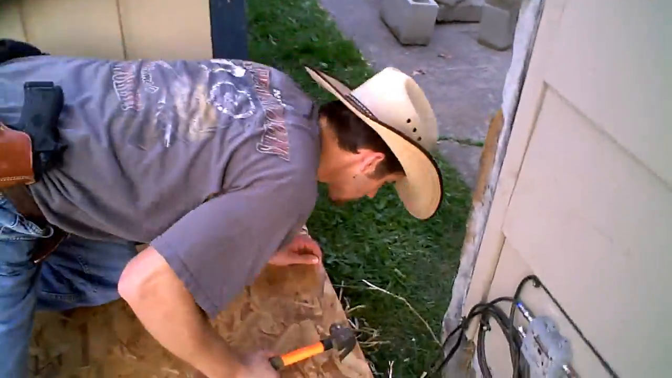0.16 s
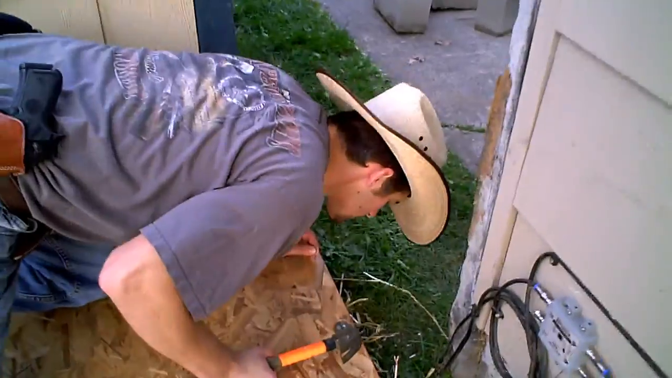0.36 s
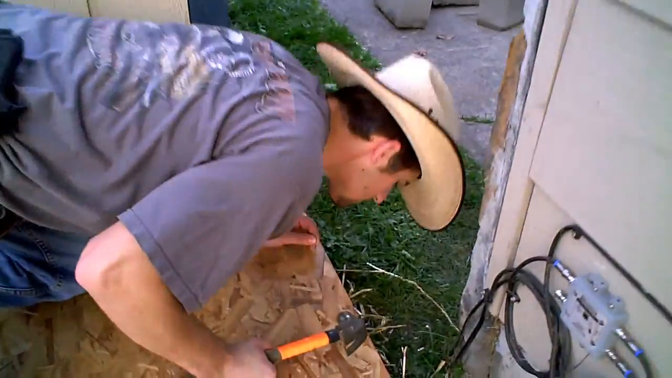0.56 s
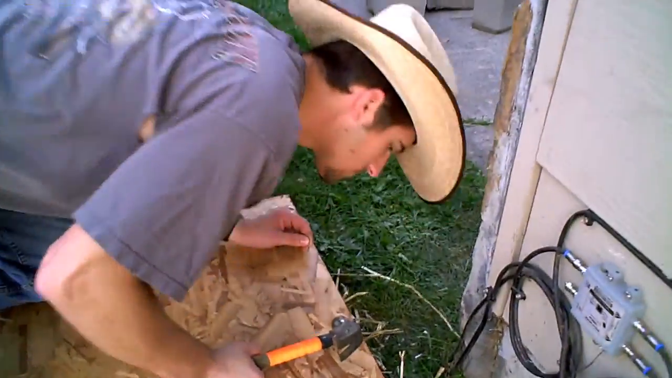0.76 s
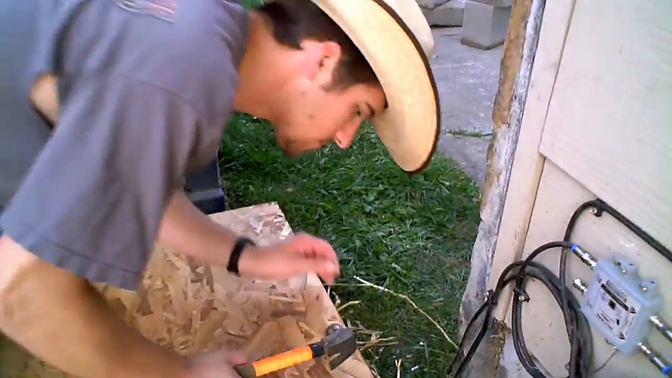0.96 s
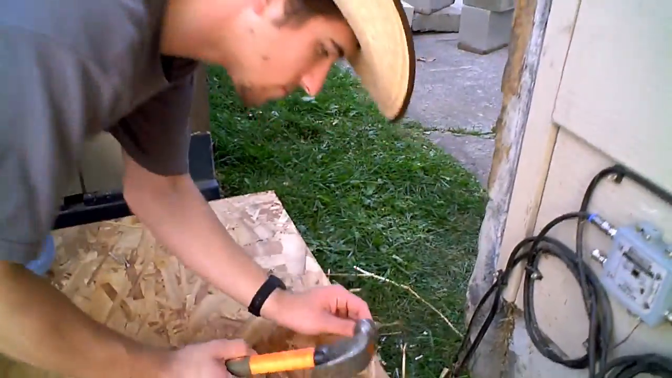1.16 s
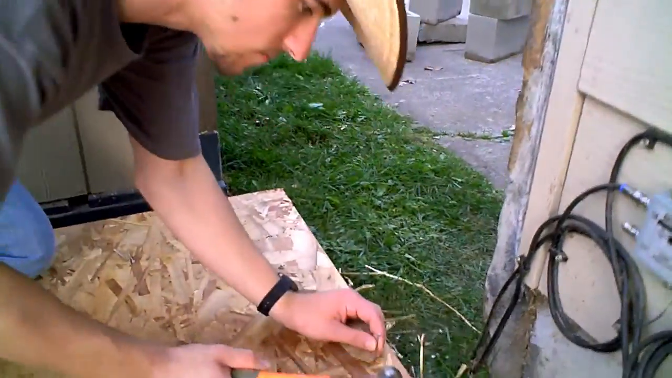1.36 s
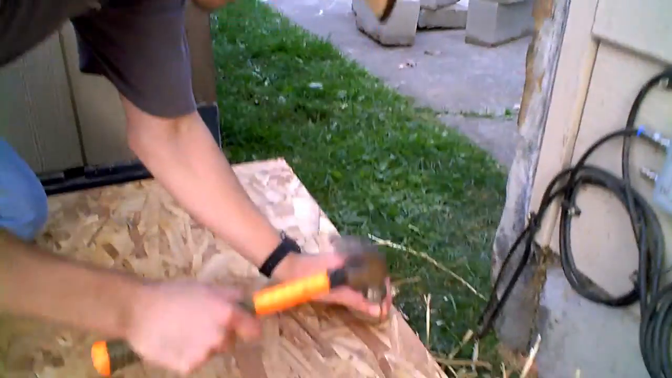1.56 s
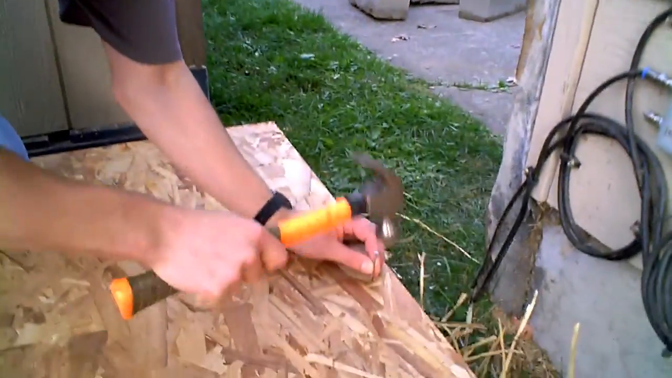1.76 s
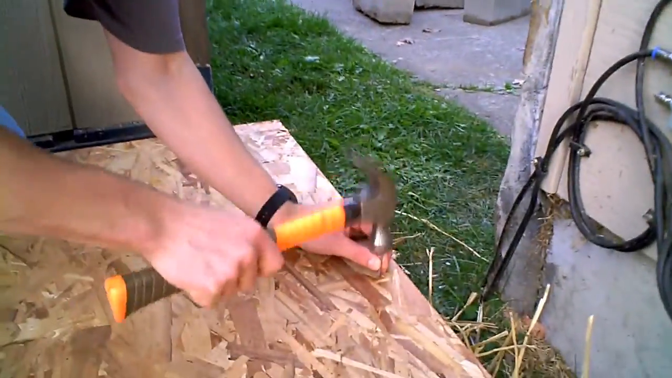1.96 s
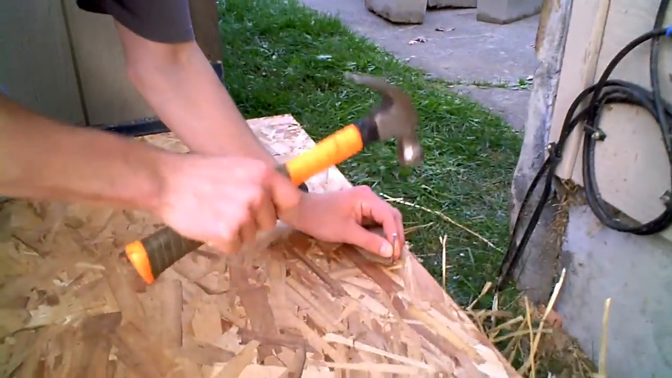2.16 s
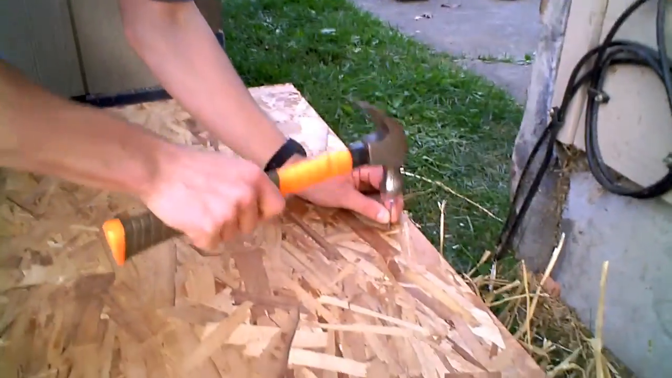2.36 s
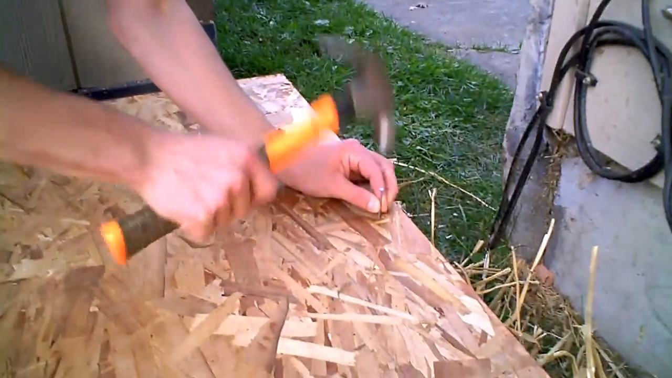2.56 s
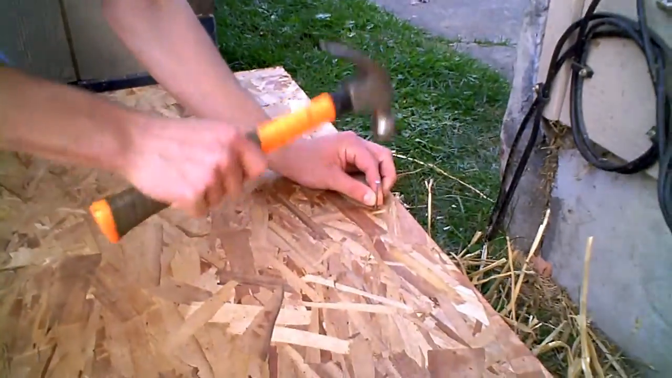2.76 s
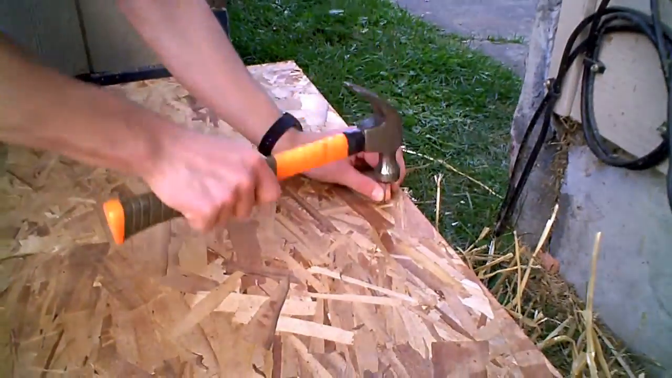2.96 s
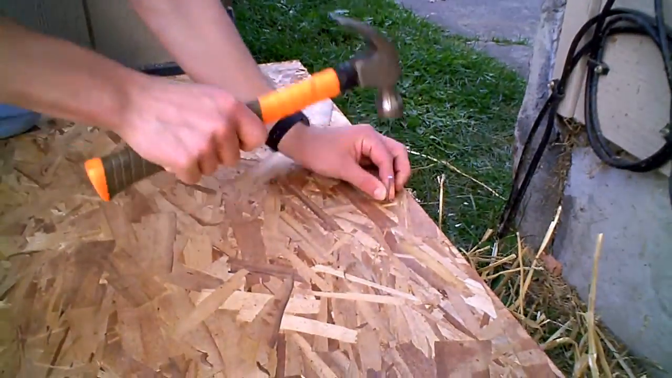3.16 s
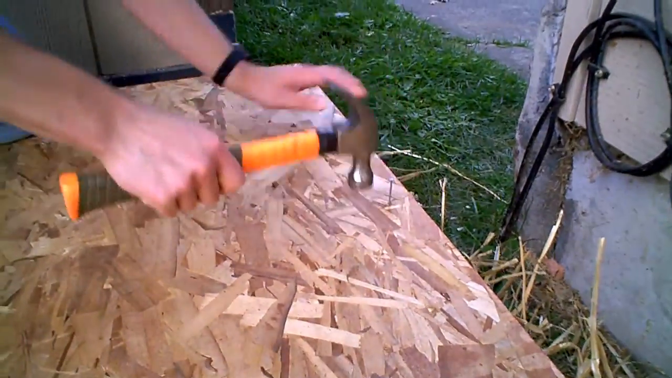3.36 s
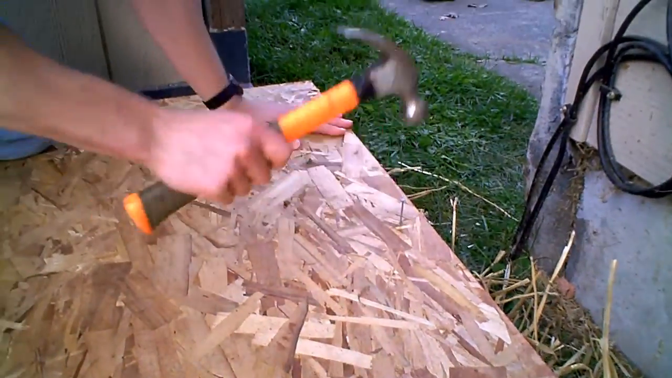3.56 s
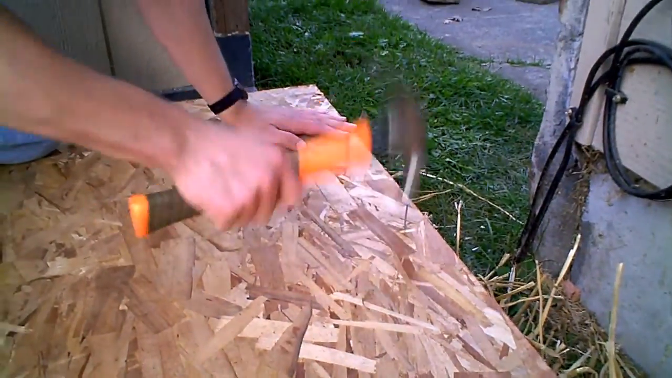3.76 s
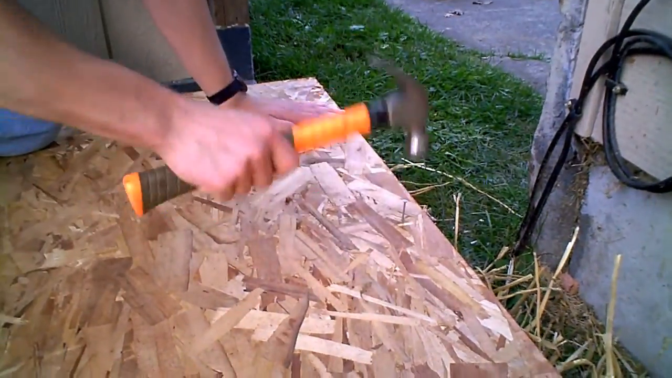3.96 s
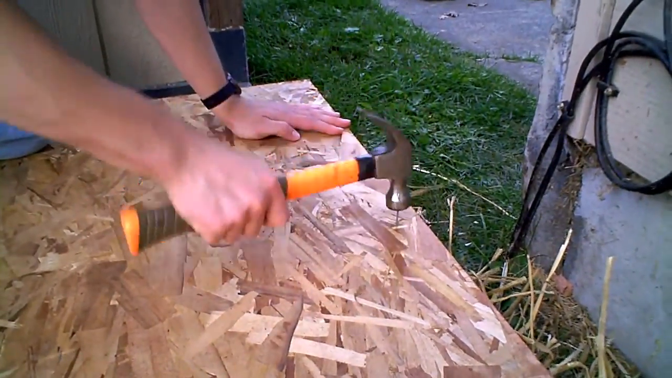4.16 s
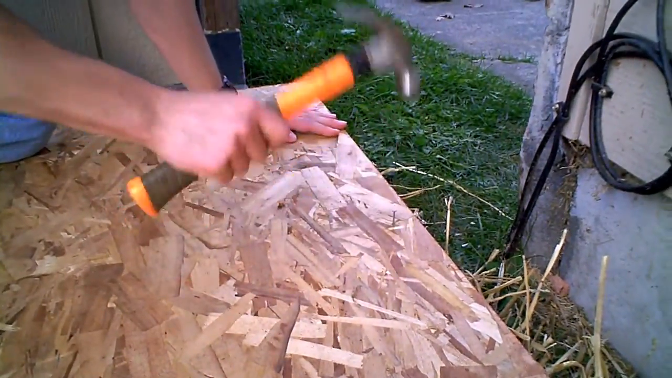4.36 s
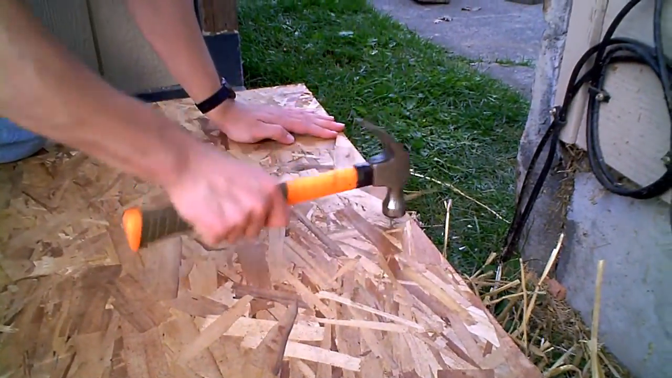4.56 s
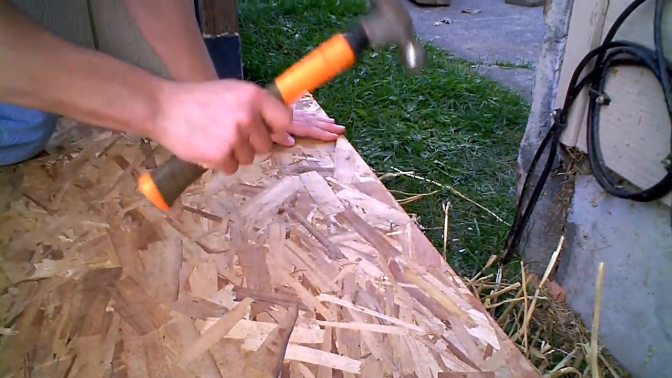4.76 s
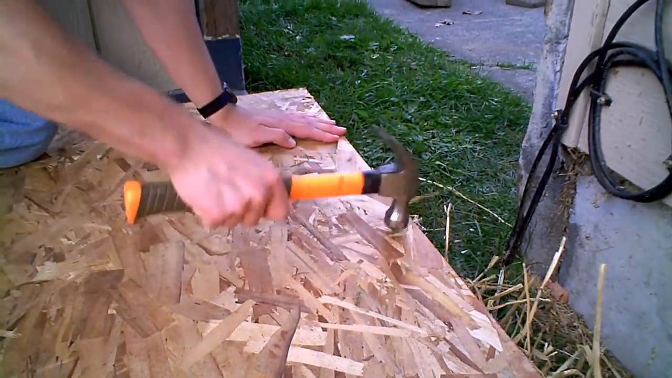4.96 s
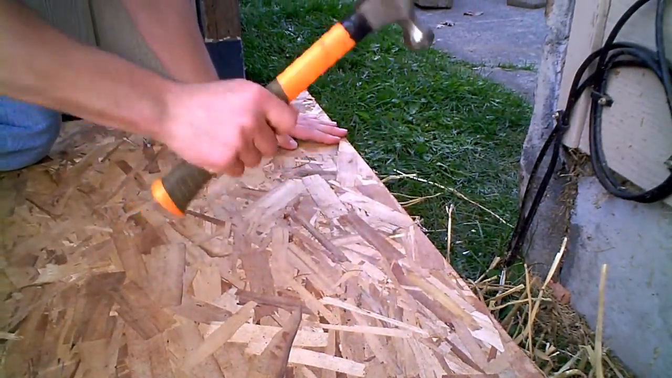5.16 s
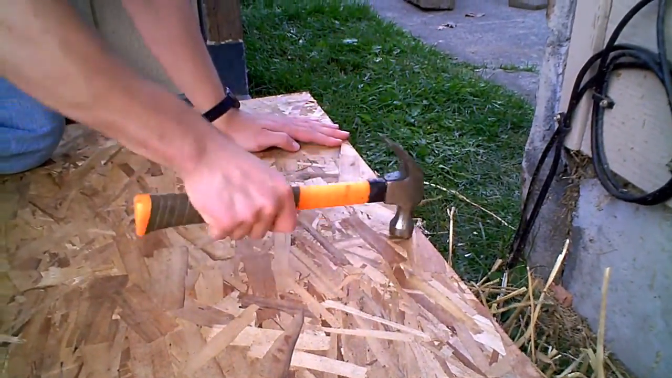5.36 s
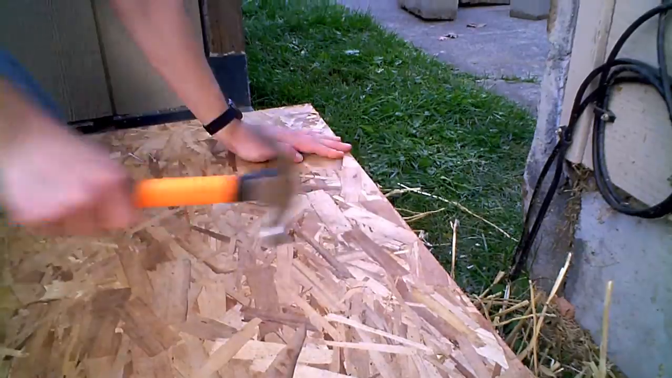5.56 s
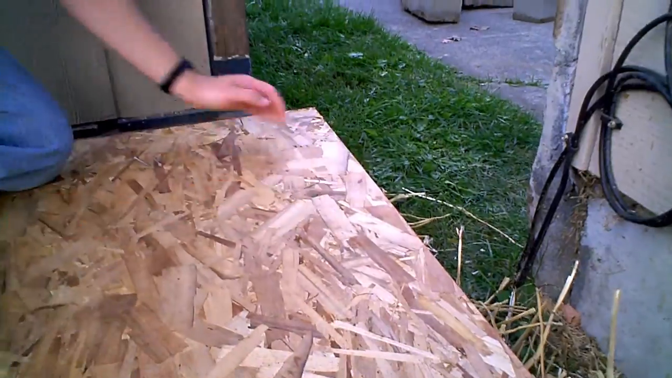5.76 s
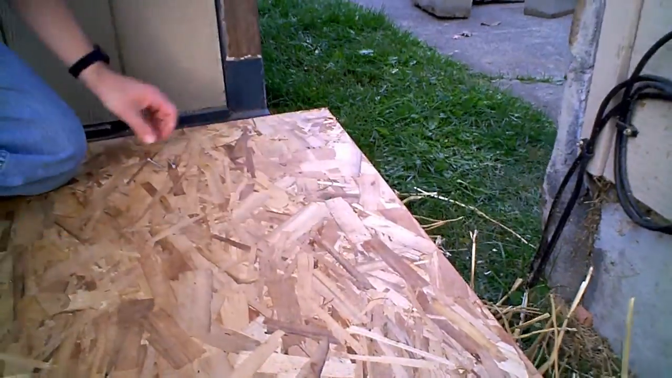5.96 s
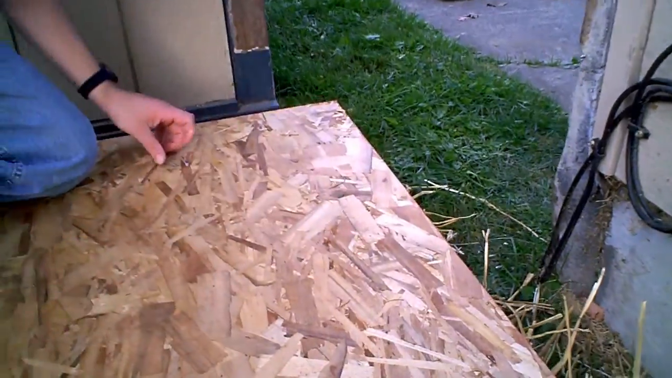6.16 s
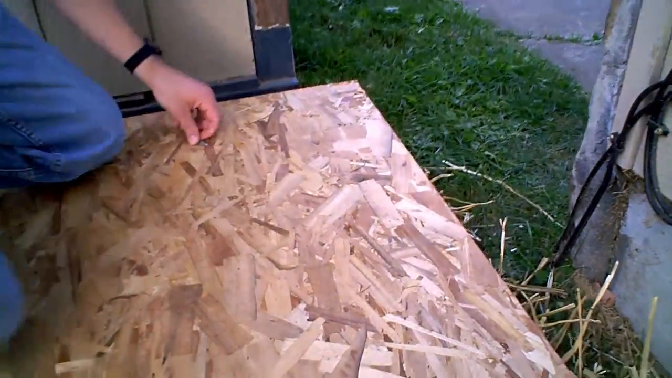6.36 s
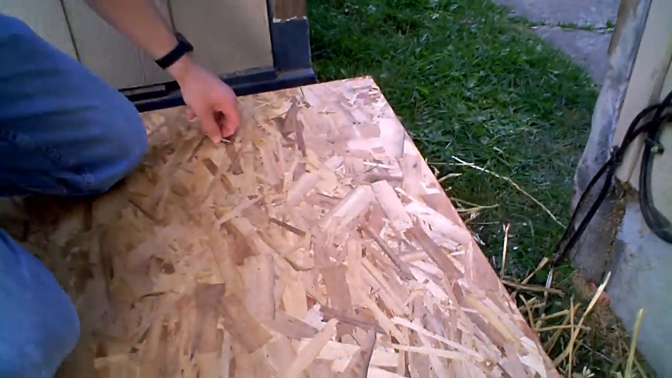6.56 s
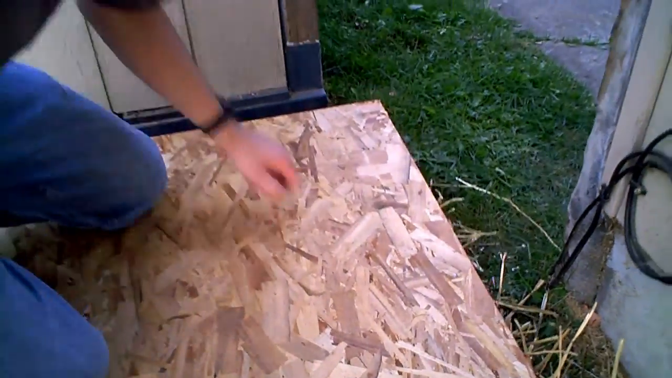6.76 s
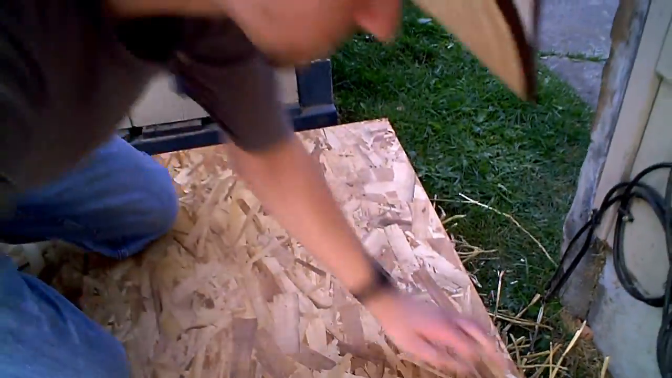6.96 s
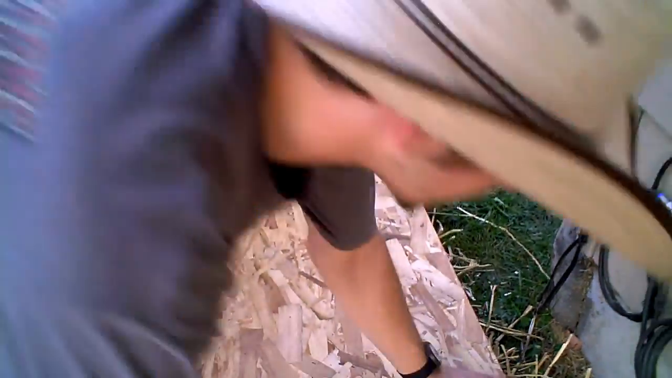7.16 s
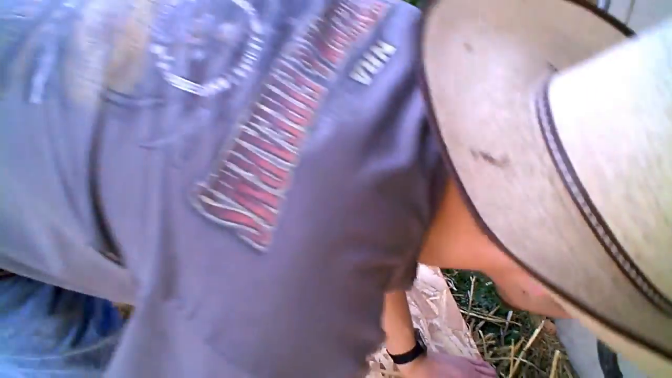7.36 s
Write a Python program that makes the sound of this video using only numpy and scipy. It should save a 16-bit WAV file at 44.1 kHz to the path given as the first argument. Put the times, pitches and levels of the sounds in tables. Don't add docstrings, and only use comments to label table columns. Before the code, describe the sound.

Nine sharp hammer blows on a nail in hollow chipboard, overloaded and boomy, small nail rattles between, then hand taps and quiet yard hum.

```python
import sys
import numpy as np
from scipy import signal
from scipy.io import wavfile

SR = 44100
rng = np.random.default_rng(int(sys.argv[2]) if len(sys.argv) > 2 else 0)


def gain_from_db(level_db):
    decades = np.asarray(level_db, float) / 20
    return 10 ** decades


def wav_record(signal):
    frames = np.transpose(np.atleast_2d(signal))
    bounded = np.clip(frames, -1, 1)
    quanta = np.round(bounded * 32767).astype(np.int16)
    wavfile.write(sys.argv[1], SR, quanta)


N = 326781
RAIL = .38

# start in seconds, peak in dB, nail ring in Hz, brightness in dB per octave,
# echo tail in dB.
BLOWS = [
    (1.948, -20.5, 4560, -0.5, -27),
    (2.259, -9.5, 3150, -1.5, -22),
    (2.568, -6, 3025, -0.5, -19.5),
    (2.891, -1, 4503, -2, -26.5),
    (3.751, -6, 3600, 2.5, -13),
    (4.128, -9.5, 4560, 2, -12.5),
    (4.497, -10.5, 3310, 3.5, -11.5),
    (4.86, -9, 2584, 1, -17.5),
    (5.221, -4, 3576, 2, -16),
]


def rms_one(x):
    return x / np.sqrt(np.mean(x ** 2) + 1e-20)


def at_hz(points, hz):
    table_hz, values = np.transpose(points)
    return np.interp(np.log(hz), np.log(table_hz), values)


def drift(rate_hz):
    knots = rng.standard_normal(400)
    return np.interp(np.arange(N) / SR * rate_hz, np.arange(400), knots)


def ring(clicks, hz, t60_s):
    r, w = gain_from_db(-60 / (t60_s * SR)), 2 * np.pi * hz / SR
    return signal.lfilter([0, np.sin(w)], [1, -2 * r * np.cos(w), r * r], clicks + 1e-18)


def bands(size, low_hz=30, step_octaves=.5):
    white = rng.standard_normal((2, size))
    edges_hz = low_hz * 2 ** np.arange(0, np.log2(19000 / low_hz), step_octaves)
    for k, (a, b) in enumerate(zip(edges_hz, edges_hz[1:])):
        band = signal.butter(2, [a, b], "band", fs=SR, output="sos")
        yield np.sqrt(a * b), signal.sosfilt(band, white[k % 2])


def highpass(x, order, hz):
    return signal.sosfilt(signal.butter(order, hz, "high", fs=SR, output="sos"), x)


def add(out, x, start_s):
    i = round(start_s * SR)
    x, i = x[max(-i, 0):], max(i, 0)
    out[i:i + len(x)] += x[:N - i]


def stroke(start_s, length_s, rise, fall_db):
    t = (np.arange(N) / SR - start_s) / length_s
    press = np.clip(t / rise, 0, 1)
    release = np.clip((1 - t) * length_s / 0.028, 0, 1)
    return press * release * gain_from_db(-fall_db * np.clip(t - rise, 0, 1))


def traffic():
    # Hz, dB per Hz.
    colour = [(18, -82), (30, -60.5), (70, -33.5), (86, -13), (121, -26), (184, -11.5), (266, -9.5),
              (336, -7), (526, -4), (760, -3), (962, -2), (1070, -4), (2480, -21), (5900, -29),
              (16000, -42.5)]
    # time in seconds, level in dB.
    swell_db = [(0.0, -55.5), (0.6, -57.5), (1.53, -56), (2.0, -58), (2.81, -56.5), (3.82, -58),
                (5.94, -57), (6.97, -54.5), (7.41, -56)]
    # start in seconds, length in seconds, pitch in Hz,
    # glide in Hz per second, level in dB.
    whines = [
        (5.85, .27, 457, -8.5, -65),
        (6.22, .2, 455, -8, -64),
        (6.432, .1, 449, -0.5, -60),
        (6.57, 0.44, 453, -20, -62.5),
        (6.71, .18, 474, 150, -60),
        (5.4, .75, 336, 5, -70),
        (4.969, 0.16, 895, 150, -59),
        (7.06, .1, 582, 20.5, -49.5),
        (7.181, 0.059, 592, 60.5, -48.5),
    ]
    calm_db, stirred_db, stirred_t60_s = -80, -70, 1.6
    t, hum, rumble = np.arange(N) / SR, 0, 0
    for hz, noise in bands(N, step_octaves=1 / 3):
        noise = gain_from_db(at_hz(colour, hz) + 1.1 * drift(8.0)) * noise
        if hz > 200:
            hum = hum + noise
        else:
            rumble = rumble + noise
    rumble_level = gain_from_db(calm_db)
    for s, db, *_ in BLOWS:
        decay_db = 60 * np.abs(t - s) / stirred_t60_s
        rumble_level = rumble_level + (t > s) * gain_from_db(min(db + 10, 0) + stirred_db - decay_db)
    hum_level = gain_from_db(np.interp(t, *np.transpose(swell_db)) - 0.13)
    out = hum_level * rms_one(hum) + rumble_level * rms_one(rumble)
    for s, length_s, hz, glide, db in whines:
        pitch_hz = hz + glide * (t - s) + 3.0 * drift(20.0)
        level = stroke(s, length_s, .2, 0) * gain_from_db(db + 3 + 1.5 * drift(15.0))
        out += level * np.sin(2 * np.pi * np.cumsum(pitch_hz) / SR)
    return out


def brushing():
    # start in seconds, length in seconds, level in dB.
    strokes = [(0.78, 0.11, -76.5), (0.967, 0.064, -76), (1.06, .11, -73), (3.125, 0.065, -76),
               (3.166, 0.046, -63.5), (3.378, 0.041, -51), (5.4, .08, -79), (5.57, .07, -75.5),
               (6.103, 0.065, -63), (6.175, 0.12, -66.5), (6.275, 0.19, -66.5), (6.82, 0.26, -69.5)]
    # Hz, dB per Hz.
    colour = [(1180, 3), (2000, -1), (2760, -6), (3460, -1.5), (6790, -10), (8670, -13), (15000, -49)]
    level = sum(gain_from_db(db) * stroke(s, length_s, rise=0.27, fall_db=5) for s, length_s, db in strokes)
    noise = 0
    for hz, x in bands(N, low_hz=1400):
        noise = noise + gain_from_db(at_hz(colour, hz) + 1.5 * drift(25.0)) * x
    return gain_from_db(6.0) * level * gain_from_db(2.0 * drift(65.0)) * rms_one(noise)


def ticks():
    # start in seconds, peak in dB, resonance in Hz.
    snaps = [(0.557, -57, 6050), (1.225, -52, 6500), (1.226, -47, 2480), (1.298, -54, 3000),
             (5.357, -58, 7000), (5.69, -64, 8300), (5.858, -62.5, 8450), (6.293, -42, 3440),
             (6.319, -54, 8800), (6.321, -43, 2760), (6.341, -54, 8200), (6.427, -53, 9500),
             (6.4917, -25.5, 3740), (6.4914, -27, 5140), (6.4995, -43, 4200), (6.492, -33.5, 1870),
             (7.085, -40, 1250), (7.0852, -48, 4000), (0.112, -45, 2500), (0.113, -52, 4300),
             (7.2326, -12, 650), (7.2328, -36, 3600), (7.167, -30, 560), (6.467, -44, 900),
             (0.826, -60, 8500), (6.4935, -44, 7600)]
    out = np.zeros(N)
    for s, db, hz in snaps:
        snap = rng.standard_normal(600) * np.exp(-np.arange(600) / 70.0)
        once = ring(np.diff(snap), hz, 4.8 / hz)
        twice = ring(once, hz, 4.8 / hz)
        add(out, gain_from_db(db) * twice / np.abs(twice).max(), s)
    return highpass(out, 2, 200)


def loose_nail():
    # start in seconds, level in dB, share on the head in dB against the flat.
    hops = [(2.302, -48, -9), (2.307, -46, -15), (2.311, -46, -19), (2.331, -49, -18), (2.339, -48, -21),
            (2.3641, -49.5, -21), (2.6284, -38, -15), (2.6436, -35.5, -10.5), (2.6624, -47, -12),
            (2.684, -54, -9), (2.6939, -43, -12), (2.727, -45, -7.5), (2.740, -46, -10),
            (2.7661, -44.5, -13), (2.7891, -51, -12), (2.936, -32, -18), (2.949, -37, -21),
            (2.9696, -33.5, -15), (2.9816, -41, -14), (3.0034, -59, -2), (3.016, -46, -15),
            (3.037, -39, -17), (3.0674, -49, -15), (3.0744, -47, -10), (3.0797, -50, -19),
            (3.0845, -47, -20), (3.1088, -45.5, -13), (3.129, -50.5, -9), (3.142, -51, -9)]
    # Hz, dB, t60 in seconds.
    flat_modes = [(1970, 0.0, .008), (2530, -3.0, .007), (3300, -4.0, .006), (4200, -5.0, .004),
                  (1500, -6.0, .006)]
    # Hz, dB, t60 in seconds.
    head_modes = [(5280, 0.0, .007), (5900, -5.0, .004), (6800, -7.0, .004), (8110, -10.0, .005),
                  (10000, -18.0, .002)]
    # start in seconds, level in dB.
    chimes = [
        (2.629, -72),
        (2.645, -76),
        (2.970, -71),
        (2.983, -76),
    ]
    rock_s, rock_loss_db = .0095, 16
    n = np.arange(900)
    out, scuff = np.zeros(N), np.exp(-n / 50) + .2 * np.exp(-n / 450)
    s, flat_db, lean_db = np.transpose(hops)
    s = np.r_[s, s + rock_s * rng.uniform(.7, 1.3, len(s))]
    flat_db = np.r_[flat_db, flat_db - rock_loss_db]
    head_db = flat_db + np.r_[lean_db, lean_db + 4]
    for modes, db in ((flat_modes, flat_db - 13), (head_modes, head_db - 4.4)):
        for hz, mode_db, t60_s in modes:
            clicks = np.zeros(N)
            clicks[(s * SR).astype(int)] = gain_from_db(db + mode_db)
            force = signal.oaconvolve(clicks, scuff)[:N] * rng.standard_normal(N)
            out += ring(force, hz, t60_s)
    out = signal.sosfilt(signal.butter(2, [1500, 9500], "band", fs=SR, output="sos"), out)
    click = 1. * (np.arange(9000) == 0)
    for s, db in chimes:
        add(out, gain_from_db(db) * ring(click, 12250, .22), s)
    return out


def strike(peak_db, ring_hz, tilt_db, boom_db, tail_db,
           rise_s, hold_s, life, sheet_db, ring_db, slap_db):
    # Hz, dB per Hz.
    crack_colour = [(150, 3), (300, 4.5), (800, 1), (1700, -0.5), (3000, -13), (4700, -7), (6500, -20),
                    (10000, -16.5), (16000, -39)]
    # Hz, t60 in seconds.
    crack_t60 = [(150, 0.21), (500, 0.089), (1500, 0.014), (5000, 0.023), (12000, 0.013)]
    # Hz, dB.
    echo_colour = [(150, 0.5), (300, 0), (1500, 0), (2400, -0.5), (3500, 5), (5000, -7.5), (8000, -2.5),
                   (12000, -11.5)]
    # Hz, t60 in seconds.
    echo_t60 = [(150, 0.9), (500, 0.27), (1500, 0.23), (4000, 0.22), (8000, 0.19), (12000, .07)]
    # Hz, dB, t60 in seconds.
    sheet_modes = [(310, 2.0, .09), (350, 1.0, .09), (410, -3.0, .09), (466, -1.0, .09), (510, -4.0, .08),
                   (556, 0.0, .09), (630, -6.0, .08), (709, -6.0, .08), (790, -9.0, .07), (883, -8.0, .07),
                   (1016, -7.0, .07), (1150, -11.0, .06), (1300, -11.0, .06), (1559, -12.0, .05),
                   (1882, -13.0, .05), (185, -1.0, .12), (218, -1.0, .11), (260, -1.0, .11)]
    # Hz, dB, t60 in seconds, sign.
    boom_modes = [(108, -3.0, .19, 1), (150, -5.0, .13, -1), (66, -12.0, .2, 1)]
    boom_lag_s, wall_s, wall_db = .0032, .032, -21
    t = np.arange(int(.45 * SR)) / SR
    click, crack = 1. * (t == 0), 0
    after = np.maximum(t - hold_s, 0)
    wall = gain_from_db(wall_db) * np.exp(-((t - wall_s) / .009) ** 2)
    patter = np.repeat(rng.standard_normal(len(t) // 100 + 1), 100)[:len(t)]
    debris = gain_from_db(2.5 * patter)
    for hz, noise in bands(len(t), low_hz=111.8):
        fading = gain_from_db(tail_db - 60 * t / life / at_hz(echo_t60, hz))
        echo = gain_from_db(at_hz(echo_colour, hz)) * (fading + wall * (1500 < hz < 6000))
        direct = gain_from_db(-60 * after / life / at_hz(crack_t60, hz))
        dying = direct + echo * (debris if hz > 1500 else 1)
        crack = crack + gain_from_db(at_hz(crack_colour, hz) + tilt_db * np.log2(hz / 1000)) * noise * dying
    crack = crack / np.abs(crack).max() * (1 - np.exp(-t / rise_s))

    shake = rng.standard_normal((len(sheet_modes), len(t)))
    shake = shake * np.exp(-after / .007) / np.sqrt(hold_s * SR + 90)
    shake = shake * np.minimum(t / hold_s, 1)
    load = 1 + .03 * rng.standard_normal(2)
    sheet = 0
    for (hz, db, t60_s), force in zip(sheet_modes, shake):
        sheet = sheet + gain_from_db(db) * ring(force, hz * load[0], t60_s * life)

    late = np.roll(click, round(boom_lag_s * SR))
    boom = sum(sign * gain_from_db(db) * ring(late, hz * load[1], t60_s) for hz, db, t60_s, sign in boom_modes)
    boom = boom * (1 - np.exp(-(t / .011) ** 2))

    touch = gain_from_db(ring_db) * ring(click, ring_hz, 0.024) - gain_from_db(slap_db) * ring(click, 440, 0.0036)
    return gain_from_db(peak_db) * (crack + gain_from_db(sheet_db) * sheet + touch) + RAIL * gain_from_db(boom_db + 8.0) * boom


def taps():
    # start in seconds, peak in dB, brightness in dB per octave, boom in dB over the
    # rail, echo tail in dB.
    contacts = [(-0.012, -34, -10, -14, -6), (0.11, -30, -5.5, -17.5, -4), (0.974, -36.5, -6, -26, -24),
                (3.377, -37.5, -0.5, -15.5, 3.5), (6.374, -48, -19, -32, -14), (6.467, -41, -4.5, -45, -2),
                (6.491, -39.5, 0, -47, -6), (6.550, -43.5, -2.5, -37, -2), (7.084, -35, -2.5, -40, -7),
                (7.167, -28, -15, -14.5, -3), (7.2323, -15, -6.0, -9, -19),
                (7.398, -48.5, -12.5, -16.5, -6.5), (6.215, -49, -19, -33, -6), (1.29, -51, -19, -32, -10)]
    out = np.zeros(N)
    for s, db, tilt_db, boom_db, tail_db in contacts:
        tap = strike(db, 1500, tilt_db, boom_db, tail_db, rise_s=0.00024, hold_s=0.00041, life=0.84,
                     sheet_db=-10, ring_db=-34.0, slap_db=-2.0)
        add(out, tap, s)
    return out * np.minimum(np.arange(N) / 130, 1)


def hammer():
    out = np.zeros(N)
    for s, db, ring_hz, tilt_db, tail_db in BLOWS:
        boom_db = min(8.0 + .22 * db, 18.5 + db)
        blow = strike(db + 5, ring_hz, tilt_db, boom_db, tail_db, rise_s=0.0006, hold_s=.0055, life=0.79,
                      sheet_db=-3.5, ring_db=-13, slap_db=-21.5)
        add(out, blow, s)
    return out


def capsule(pressure):
    held = np.clip(pressure, -RAIL * 1.15, RAIL)
    held = highpass(highpass(held, 2, 290), 1, 290)
    return signal.sosfilt(signal.butter(2, 11000, fs=SR, output="sos"), held)


def scene():
    quiet = loose_nail() + ticks() + brushing() + traffic()
    return (capsule(hammer() + taps()) + quiet)[None]


def low_pass(x):
    return signal.sosfilt(signal.butter(12, 16830, fs=SR, output="sos"), x)


def record(dry):
    top_cut = signal.cheby2(12, 60, 17000, fs=SR, output="sos")
    mix = signal.sosfilt(top_cut, np.clip(dry, -.72, .72))
    return low_pass(mix)


dry = scene()
out = record(dry)
wav_record(out)
```